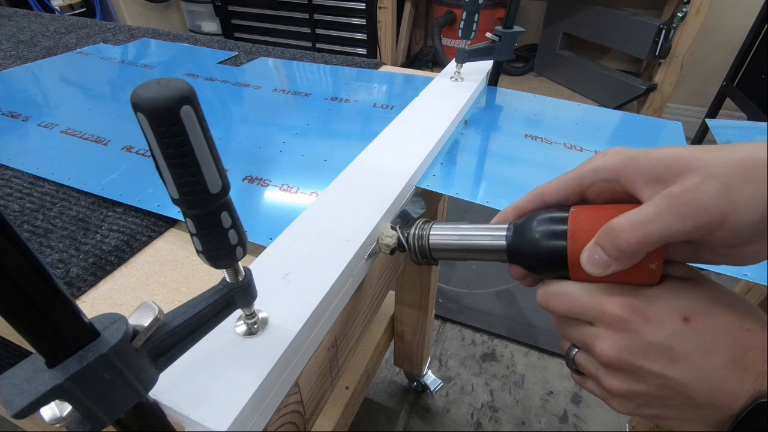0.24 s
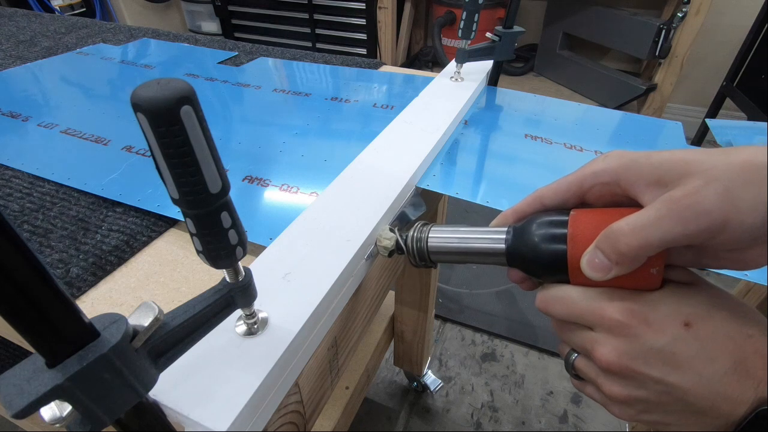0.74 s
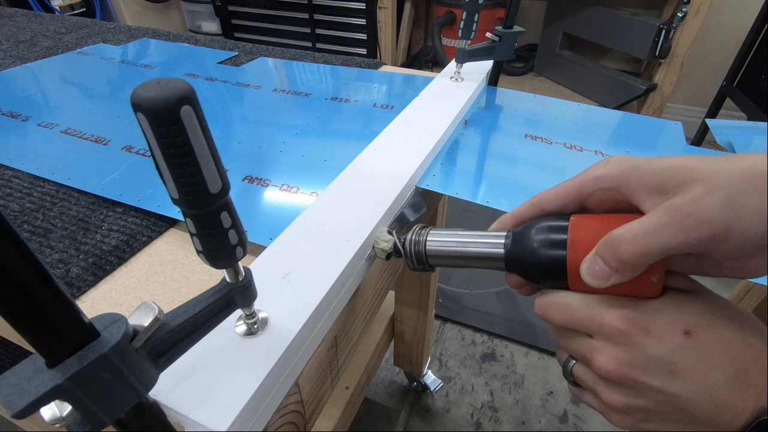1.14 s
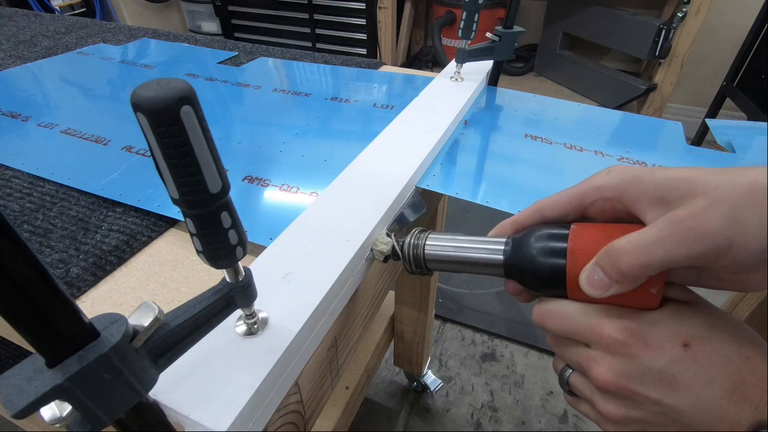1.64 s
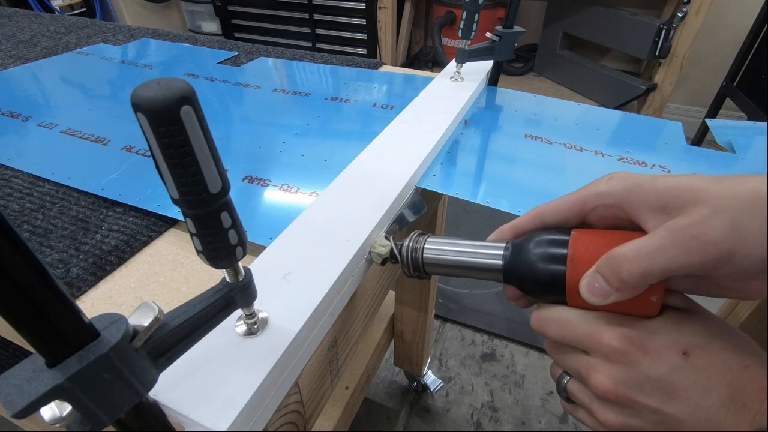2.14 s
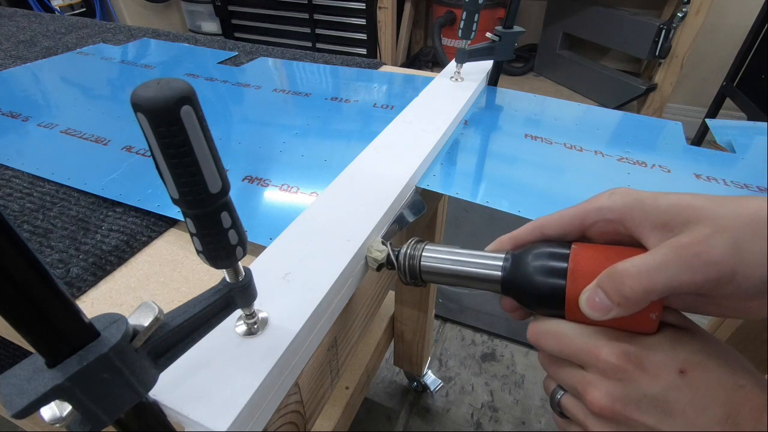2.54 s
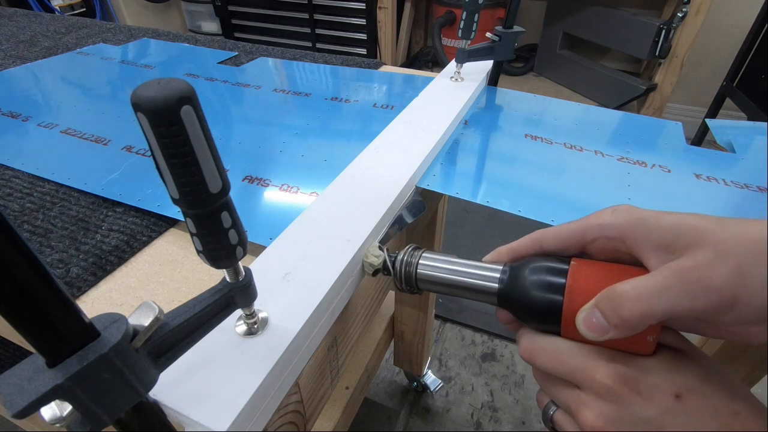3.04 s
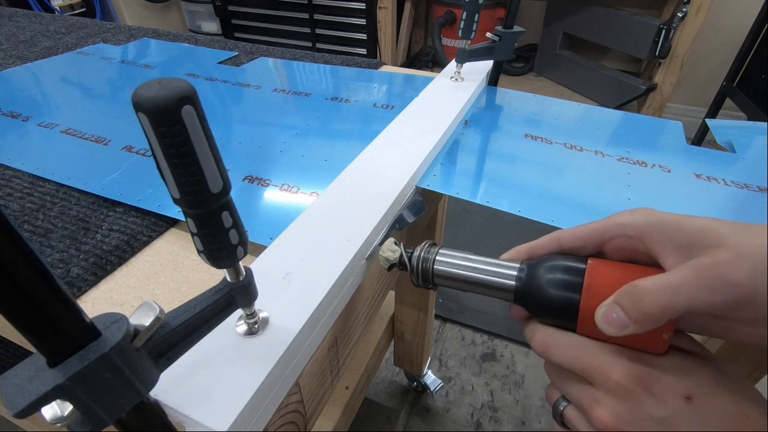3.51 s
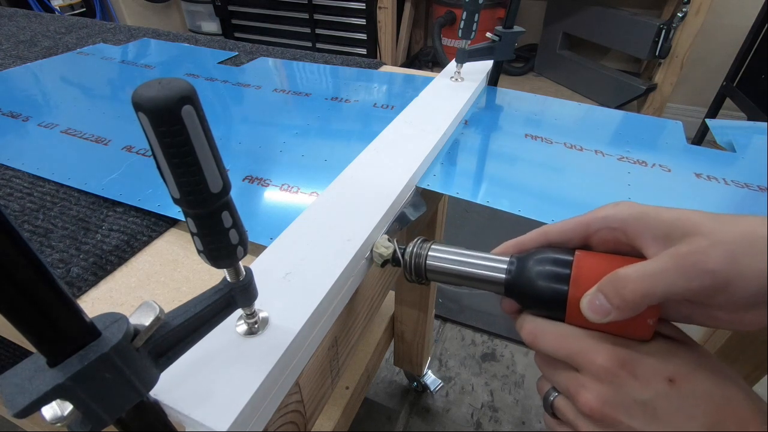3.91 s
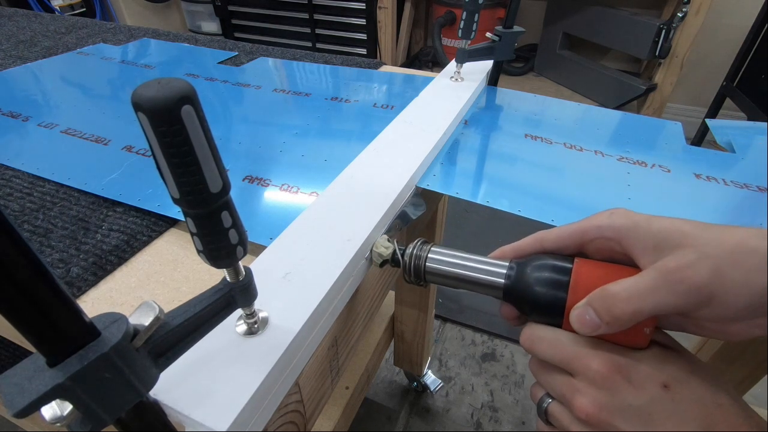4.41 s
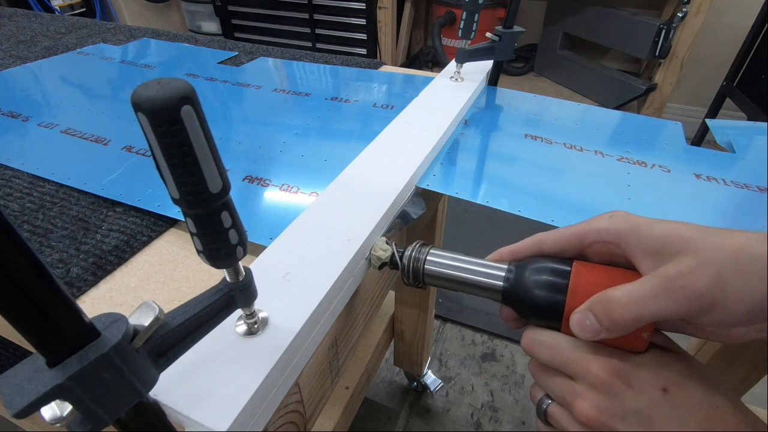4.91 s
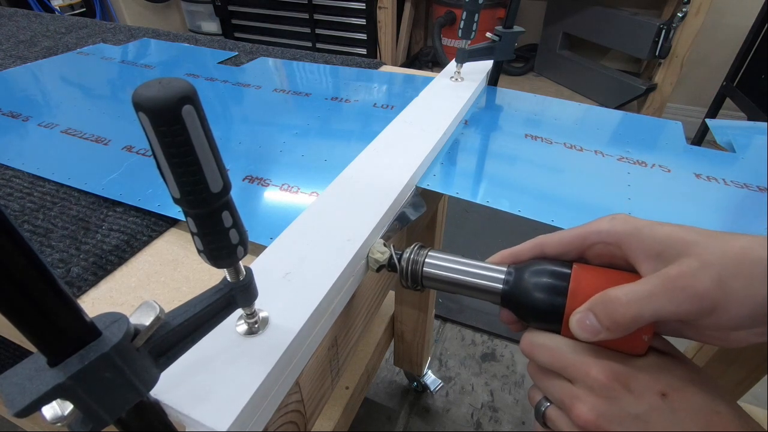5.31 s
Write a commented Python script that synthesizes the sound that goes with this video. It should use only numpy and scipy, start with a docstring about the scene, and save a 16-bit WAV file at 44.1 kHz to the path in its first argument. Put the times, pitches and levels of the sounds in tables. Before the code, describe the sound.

Close to the microphone in a garage, a pneumatic rivet gun is already hammering rapidly on a wooden bar clamped over aluminium sheet. Each blow mixes a steel crack, a woody knock and a tinny rattle, over hissing exhaust air. After about three seconds it stops with a click and the room rings briefly. Another click starts a second, slightly faster and more rattly run.

```python
"""A pneumatic rivet gun, close up and already running, hammers a wooden bar clamped on aluminium sheet.
At each blow the steel set cracks, the bar knocks and the sheet rattles, more freely as the gun leans;
the piston is thrown back with a hollow thump. The gun stops, a few clicks follow, then a second run.
Exhaust air hisses, a draught buffets the microphone, and the garage rings on after each run."""
import sys
import numpy as np
from scipy import signal
from scipy.fft import rfft, irfft, next_fast_len
from scipy.io import wavfile
from scipy.ndimage import uniform_filter1d

SR = 44100
rng = np.random.default_rng(int(sys.argv[2]) if len(sys.argv) > 2 else 0)


def log_audio(samples):
    """Write samples as a 16-bit WAV file to the path given in sys.argv[1]."""
    # one column per channel
    frames = np.atleast_2d(samples).T
    # limit to full scale, then quantise
    limited = np.clip(frames, -1, 1)
    pcm = np.round(limited * 32767).astype(np.int16)
    wavfile.write(sys.argv[1], SR, pcm)


N = 244755
TIME = np.arange(N) / SR
AGE = TIME[:SR // 3]  # seconds since a blow
LEAD_S = .5  # the gun is already running at time zero
CLOCK = np.arange(N + int(LEAD_S * SR)) / SR - LEAD_S


# The gun's tilt on the bar. Each row: time in seconds, lean from 0 (square) to 1 (full).
GUN_LEAN = [(0, 0.21), (1.5, 0), (2.2, 0.2), (2.55, 0.58), (2.9, 0.98), (4.32, 0.89), (5.5, 1)]
def rivet_gun():
    """Every blow sounds steel, wood, sheet, piston and valve, never twice at quite the same strength."""
    times, run_age, knock_db = blows()
    force_scatter, knock_scatter, thump_scatter = rng.standard_normal((3, len(times)))
    lean = curve(GUN_LEAN, times)
    unseated = run_age == 0  # a run's first blow finds the set not yet seated
    surge_db = 4.5 * np.exp(-run_age / .19)  # a full hose drives the first blows harder
    force = amp(surge_db - 3.5 * lean + .5 * force_scatter)  # leaning softens the crack
    knock_db = knock_db - 9.5 * unseated + .76 * knock_scatter
    thump_db = .5 * knock_db + .73 * thump_scatter
    return (steel_set(times, force, lean) + wooden_bar(times, amp(knock_db))
            + loose_sheet(times, lean, unseated) + piston(times, amp(thump_db)) + valve(times, force))


# Trigger pulls. Each row: first blow, rough last blow and air shut-off in seconds,
# then relative levels of knock, hiss and jet in dB.
TRIGGER_PULLS = [(-0.4327, 2.93, 3.02, -0.8, -1.5, -4), (4.3237, 5.54, 5.7, -2, -1.5, 0.5)]
# The piston's tempo, following the air pressure. Each row: time in seconds, blows per second.
BLOW_RATE = [(0, 16.672), (.7, 16.56), (2.55, 16.782), (2.9, 16.655), (4.32, 18), (4.38, 18.61),
             (4.65, 18.189), (5.5, 18.029)]
def blows():
    """The piston cycles while the trigger is held: blow times, seconds into the run, knock levels in dB."""
    rows = []
    for first, last, _, knock_db, _, _ in TRIGGER_PULLS:
        at = first
        while at < last + .5 / curve(BLOW_RATE, at):
            rows.append((at, at - first, knock_db))
            at += 1 / curve(BLOW_RATE, at)
    return np.transpose(rows)


# The bright snap of steel. Each row: frequency in Hz, relative level in dB.
CRACK_COLOUR = [(500, -4), (1500, -7.5), (3000, -1), (4000, 1), (5000, 3.5), (7000, -2.5), (10500, 3.5),
                (13000, -2.5), (16000, -25)]
def steel_set(times, force, lean):
    """Steel hits steel: a ring and a crack, partly the same each time, partly fresh chatter."""
    square = strike(times, force * (1 - lean), steel_ring(lean=0))
    leaning = strike(times, force * lean, steel_ring(lean=1))
    snap = strike(times, force, crack() * noise(CRACK_COLOUR, len(AGE)))
    chatter = bursts(times, force, crack(), CRACK_COLOUR)
    return amp(-19) * (square + leaning + chatter) + amp(-22) * snap


# The ping of set and barrel. Each row: pitch in Hz, relative level in dB, t60 in seconds,
# delay in seconds, level change at full lean in dB.
STEEL_MODES = [(1806, -1.5, 0.015, 0.00033, -2), (3059, 5.5, 0.0094, 0.0017, -5.5),
               (4395, 7.5, 0.0063, 0.0013, 3.5), (5334, 12.5, 0.0078, 0.0014, -8.5),
               (6835, 8.5, 0.0044, 0.0009, -16), (8920, -7, .008, 0.0004, 3),
               (11000, 1.5, 0.009, 0.00076, -5.5), (12130, -14.5, .008, 0.00027, -2)]
def steel_ring(lean):
    """The set's modes come in a moment apart; leaning the gun shifts their balance."""
    ping = 0
    for hz, db, t60, delay, lean_db in STEEL_MODES:
        envelope = np.interp(AGE - delay, AGE, fade(t60, .00046), left=0)
        ping += amp(db + lean * lean_db) * envelope * np.sin(2 * np.pi * hz * AGE)
    return ping


def crack(contact_s=.0028):
    """Envelope of steel on steel: the faces chatter for a few milliseconds, then a short ring follows."""
    attack = 1 - np.exp(-AGE / .0002)
    return attack * (np.exp(-(AGE / contact_s) ** 4) + amp(-6) * fade(.053, .0005))


# The body of bar, clamps and bench. Each row: pitch in Hz, relative level in dB, t60 in seconds.
WOOD_MODES = [(147, -20.5, 0.28), (162.3, -16, 0.26), (223.2, -15, 0.36), (273, -11.5, 0.042),
              (338.1, -4, 0.16), (388.2, -5, 0.22), (442.7, -6.5, 0.23), (578, 0, 0.062),
              (675.2, 3.5, 0.075), (825, -4.5, 0.052), (890, 0.5, 0.047), (1064, -26, 0.071),
              (1188.3, 0.5, .11), (1275, -1, .07), (1422, 0.5, .05), (1467, -7.5, 0.085),
              (1785, -7.5, 0.058)]
# The woody grain of the knock. Each row: frequency in Hz, relative level in dB.
WOOD_COLOUR = [(120, -19.5), (250, -11.5), (450, -4.5), (670, 6.5), (1000, 0.5), (1250, 4.5), (1700, -7.5),
               (2500, -17), (4000, -21), (9000, -42)]
def wooden_bar(times, gains):
    """The struck bar knocks: ringing modes, a repeating grain and a tail of fresh noise."""
    decay = fade(.17, .0015)
    grain = clatter(WOOD_COLOUR, lumpy_db=4.5) * (amp(-25.5) * decay + amp(-23) * fade(.016, .00076))
    knock = amp(-23.5) * ring(WOOD_MODES, rise=.001) + grain
    return strike(times, gains, knock) + amp(-28.5) * bursts(times, gains, decay, WOOD_COLOUR)


# The clang of aluminium. Each row: pitch in Hz, relative level in dB, t60 in seconds.
SHEET_MODES = [(174.6, -5.5, 0.39), (213.4, -8, 0.28), (384.3, 4, 0.11), (627, -9.5, 0.38),
               (1076, -3, 0.065), (1166, -2.5, 0.18), (1233, 3.5, 0.082), (1506.5, 5.5, 0.079),
               (1980, -17, .11), (2025, 1.5, .2), (2364, -0.5, .15), (2844, 3.5, 0.05)]
# Its tinny rattle. Each row: frequency in Hz, relative level in dB.
RATTLE_COLOUR = [(300, -33), (800, -4), (1300, 2.5), (1750, 0), (2100, 9.5), (2550, 1.5), (3000, 3),
                 (3600, -9.5), (6000, -13.5), (12000, -13), (16000, -51)]
def loose_sheet(times, lean, unseated):
    """The further the gun leans, the more freely the sheet rattles against the bar."""
    slack = amp(-15.5 * (1 - lean) + 2.5 * lean - 17 * unseated)
    slap = fade(.24, .001) + amp(-1) * fade(.0079, .00079)
    clang = amp(-29.5) * ring(SHEET_MODES, rise=.00048)
    rattle = amp(-31) * slap * clatter(RATTLE_COLOUR, lumpy_db=4)
    return strike(times, slack, clang + rattle) + amp(-25) * bursts(times, slack, slap, RATTLE_COLOUR)


# Strike, then return. Each row: pitch in Hz, relative level in dB, delay and width in seconds.
PISTON_STROKES = [(409, -25.5, 0.00579, 0.0059), (430.2, -17.5, .0365, 0.0062)]
def piston(times, gains):
    """Each stroke of the piston pushes out a hollow thump of air."""
    thumps = 0
    for hz, db, delay, width in PISTON_STROKES:
        t = AGE - delay
        thumps += amp(db) * np.exp(-(t / width) ** 2) * np.sin(2 * np.pi * hz * t)
    return strike(times, gains, thumps)


def valve(times, force, cycle_share=.645):
    """The valve flips with a tick at the end of the return stroke."""
    flips = times + cycle_share / curve(BLOW_RATE, times)
    return bursts(flips, amp(-34) * force, fade(.024, .0002), CRACK_COLOUR)


# Stray clicks. Each row: start in seconds, relative levels of steel tick and wood knock in dB.
IDLE_CLICKS = [(3.0117, -3, -9), (3.246, -42.5, -50), (4.146, -52, -28), (4.161, -35, -42),
               (4.307, -9, -24)]
def clicks():
    """Trigger, valve and piston come to rest, ticking on the steel and nudging the bar; once a hand bumps the
    bar with a low knock."""
    times, tick_db, knock_db = np.transpose(IDLE_CLICKS)
    grain = amp(-28) * fade(.053, .001) * noise(WOOD_COLOUR, len(AGE))
    knock = amp(-34) * ring(WOOD_MODES, rise=.0012) + grain
    ticks = bursts(times, amp(tick_db - 18.5), crack(), CRACK_COLOUR)
    return ticks + strike(times, amp(knock_db), knock)


# A broad hiss and a thin, high jet. Each row: frequency in Hz, relative level in dB.
HISS_COLOUR = [(200, 6), (1000, 13), (2200, 6.5), (3300, -2), (4600, 7), (6500, -23), (8500, -7),
               (11800, -16.5), (13500, -5.5), (16000, -27)]
HIGH_JET_COLOUR = [(5000, -30.5), (8000, -13), (9500, -10.5), (10800, -20), (11900, -5), (13000, -22.5),
                   (16000, -14.5)]
def exhaust(attack_s=.014, release_s=.039):
    """Air blows out while the trigger is held; more hiss escapes as the gun leans."""
    hiss = jet = 0
    for first, _, shut, _, hiss_db, jet_db in TRIGGER_PULLS:
        opening = np.clip(1 + (CLOCK - first) / attack_s, 0, 1)
        flow = opening * gate(first, shut, attack_s, release_s)
        hiss += flow * amp(hiss_db + 3.5 * curve(GUN_LEAN, CLOCK))
        jet += flow * amp(jet_db)
    return (amp(-34) * hiss * noise(HISS_COLOUR, len(CLOCK))
            + amp(-42) * jet * noise(HIGH_JET_COLOUR, len(CLOCK)))


# Faint puffs between runs. Each row: peak time, swell and fade in seconds, level in dB.
SEEP_PUFFS = [(3.52, 0.087, 0.12, -66), (4.18, .01, .15, -65), (4.3, .03, .015, -55)]
# Their breathy tone. Each row: frequency in Hz, relative level in dB.
SEEP_COLOUR = [(800, -3), (1900, 0), (2350, 4), (2900, -1), (4700, -4), (5800, -11), (7000, -10),
               (8100, -5), (10000, -12), (13000, -17), (16000, -34.5)]
def seep():
    """A little air slips past the half-closed valve."""
    flow = sum(amp(db) * gate(at, at, swell, fall) for at, swell, fall, db in SEEP_PUFFS)
    return flow * noise(SEEP_COLOUR, len(CLOCK))


# The rise and fall of the draught. Each row: time in seconds, relative level in dB.
GUSTS = [(0.0, -51), (0.28, -58), (0.69, -32), (0.76, -24), (0.88, -38), (0.93, -25.5), (1.68, -54.5),
         (1.98, -40), (2.1, -27), (2.3, -36), (2.35, -30.5), (2.55, -44), (2.64, -29), (2.92, -33.5),
         (2.97, -50), (3.07, -31.5), (3.37, -47), (3.48, -38), (3.54, -41), (3.71, -41.5), (3.83, -58),
         (4.47, -44), (4.84, -31), (4.87, -39), (5.36, -39), (5.55, -61)]
# Its deep rumble. Each row: frequency in Hz, relative level in dB.
BUFFET_COLOUR = [(5, -6), (11, 6), (22, -18.5), (35, -15.5), (60, -31), (110, -43.5), (300, -81),
                 (2000, -130)]
def draught():
    """Slow eddies press on the microphone, as strongly as the draught blows."""
    eddies = noise(BUFFET_COLOUR, N)
    eddies /= np.sqrt(uniform_filter1d(eddies ** 2, size=SR // 8))  # even out the level
    return eddies * amp(curve(GUSTS, TIME) + 10.5)


# The garage's tail. Each row: band centre in Hz, t60 in seconds, relative level in dB.
GARAGE_BANDS = [(148, 0.31, -1.5), (407, 0.72, -1), (1020, 0.62, 1), (2800, 0.75, -5.5), (7300, .44, -7.5),
                (14000, 0.21, -9)]
def garage(sound, build_s=.02):
    """Diffuse reverberation, band by band, with the top treble dying first."""
    t = TIME[:SR]
    hz, t60, wet_db = np.transpose(GARAGE_BANDS)
    octave = np.log2(np.maximum(np.fft.rfftfreq(SR, 1 / SR), 1))
    spectrum = np.exp(2j * np.pi * rng.random(len(octave)))
    tail = 0
    for weights, decay, db in zip(np.eye(len(hz)), np.log(1000) / t60, wet_db):
        band = irfft(spectrum * np.interp(octave, np.log2(hz), weights), SR)
        tail += amp(db) * np.sqrt(2 * decay) * band * np.exp(-decay * t)
    onset = 1 - np.exp(-(t / build_s) ** 2)
    return signal.fftconvolve(sound, tail * onset)[:len(sound)]


# The quiet of the garage. Each row: frequency in Hz, relative level in dB.
ROOM_COLOUR = [(35, -37), (60, -12.5), (309, -15), (364, -15), (458, -15.5), (491, -15), (816, -17.5),
               (916, -20.5), (1010, -22), (5550, -37.5), (15000, -51)]
def room_tone():
    """A soft, steady bed with a thin whistle of leaking air in it."""
    whistle = amp(-82) * noise([(6250, -75.5), (6550, -8), (6850, -74.5)], N)
    return amp(-60.5) * noise(ROOM_COLOUR, N) + whistle


def amp(db):
    """Decibels to gain."""
    return 10 ** (np.asarray(db) / 20)


def curve(rows, at):
    """Straight lines through (seconds, value) rows."""
    return np.interp(at, *np.transpose(rows))


def noise(colour, size):
    """Noise of rms 1 with the given spectrum."""
    hz, db = np.transpose(colour)
    length = next_fast_len(size)
    bins = np.maximum(np.fft.rfftfreq(length, 1 / SR), 1)
    shape = amp(np.interp(np.log(bins), np.log(hz), db))
    x = irfft(rfft(rng.standard_normal(length)) * shape, length)[:size]
    return x / x.std()


def clatter(colour, lumpy_db):
    """Noise in lumps of a millisecond or two, as loose surfaces slap together."""
    lumps = uniform_filter1d(uniform_filter1d(rng.standard_normal(len(AGE)), size=48), size=48)
    envelope = amp(lumpy_db * np.tanh(lumps / lumps.std()))
    return noise(colour, len(AGE)) * envelope / np.sqrt(np.mean(envelope ** 2))


def fade(t60, rise):
    """Envelope that builds over `rise` seconds and falls 60 dB in `t60` seconds."""
    return (1 - np.exp(-AGE / rise)) * np.exp(-np.log(1000) * AGE / t60)


def gate(start, end, attack, release):
    """Envelope that swells up to `start`, holds until `end` and dies away."""
    return np.exp(-np.maximum(start - CLOCK, 0) / attack - np.maximum(CLOCK - end, 0) / release)


def ring(modes, rise):
    """Struck modes; neighbours swing in opposite directions."""
    return sum((-1) ** k * amp(db) * fade(t60, rise) * np.sin(2 * np.pi * hz * AGE)
               for k, (hz, db, t60) in enumerate(modes))


def strike(times, gains, response):
    """The same response set off at each time, with its own strength."""
    train = np.zeros(len(CLOCK) + SR)
    train[np.round((times + LEAD_S) * SR).astype(int)] = gains
    return signal.oaconvolve(train, response)[:len(CLOCK)]


def bursts(times, gains, envelope, colour):
    """Fresh noise under an envelope set off at each time; overlapping bursts add in power."""
    power = strike(times, gains ** 2, envelope ** 2)
    return np.sqrt(np.maximum(power, 0)) * noise(colour, len(CLOCK))


def scene():
    """Gun, air and room, the same in both channels."""
    gun = rivet_gun() + clicks() + seep() + exhaust()
    mono = (gun + garage(gun))[-N:] + draught() + room_tone()
    return np.array([mono, mono])


def record(dry):
    """Round the loudest peaks and cut the top."""
    ceiling, top_hz = .7, 15900
    lowpass = signal.ellip(8, .2, 80, top_hz, fs=SR, output="sos")
    return signal.sosfilt(lowpass, ceiling * np.tanh(dry / ceiling))


dry = scene()
out = record(dry)
log_audio(out)
```